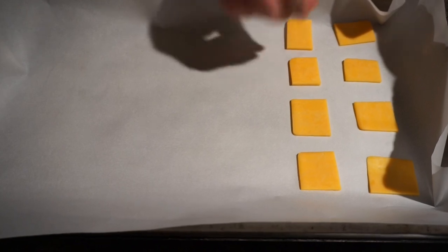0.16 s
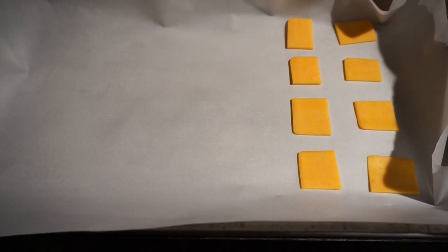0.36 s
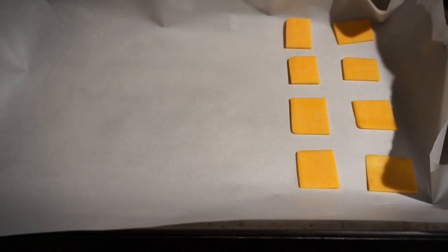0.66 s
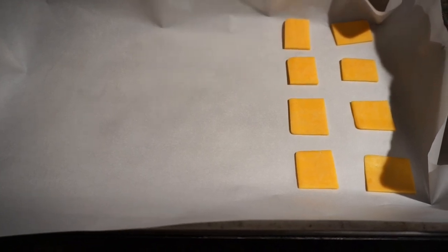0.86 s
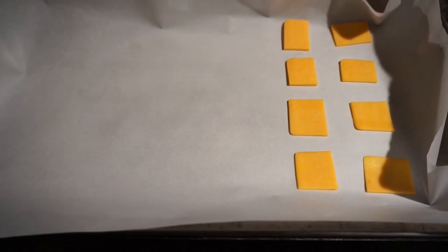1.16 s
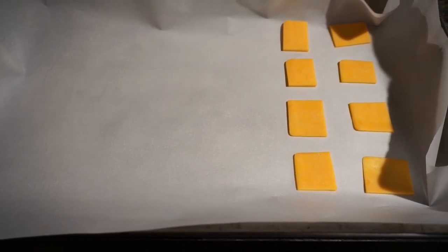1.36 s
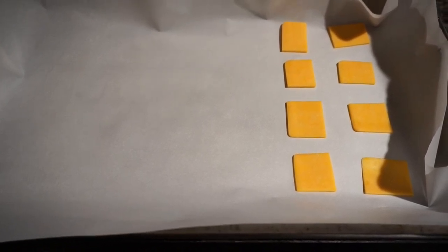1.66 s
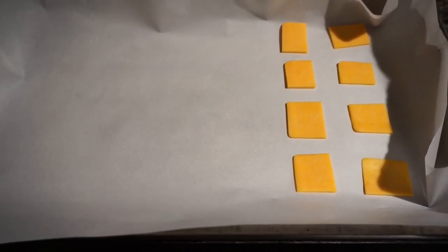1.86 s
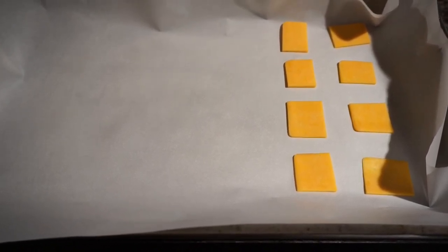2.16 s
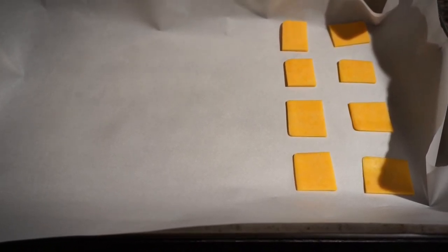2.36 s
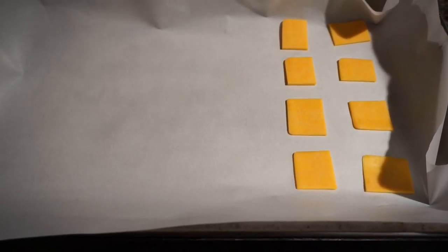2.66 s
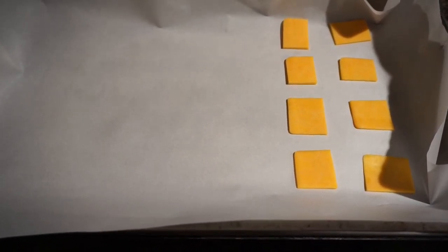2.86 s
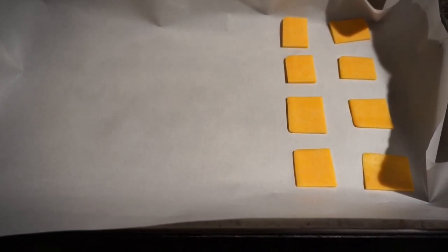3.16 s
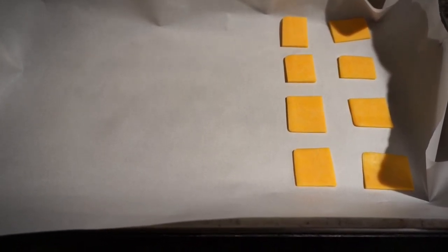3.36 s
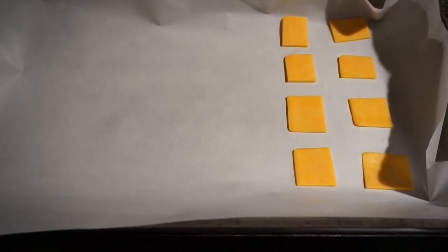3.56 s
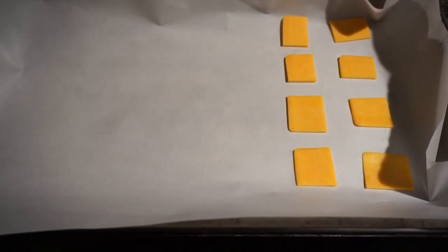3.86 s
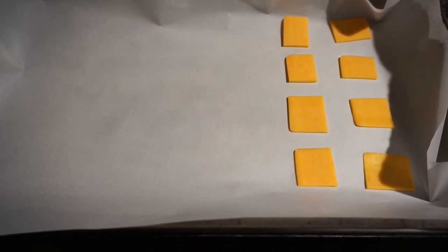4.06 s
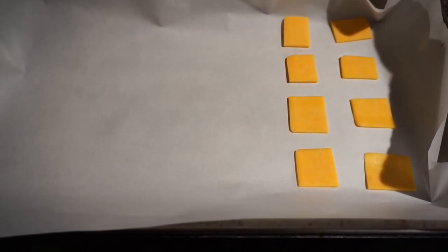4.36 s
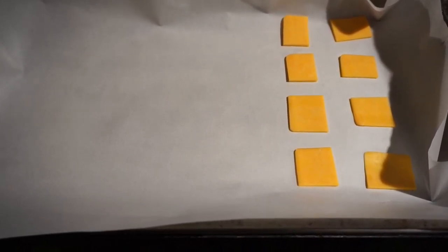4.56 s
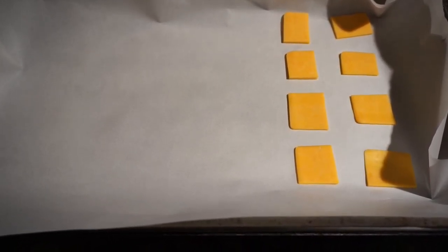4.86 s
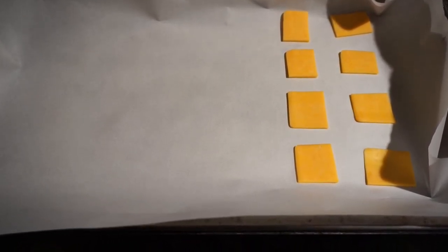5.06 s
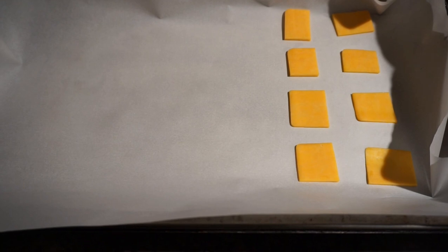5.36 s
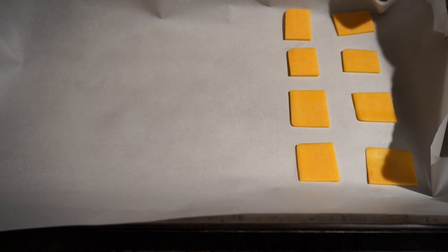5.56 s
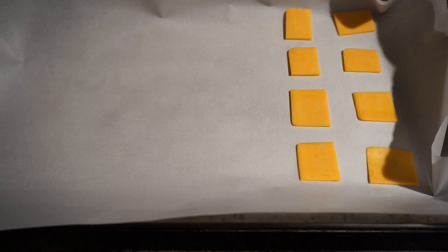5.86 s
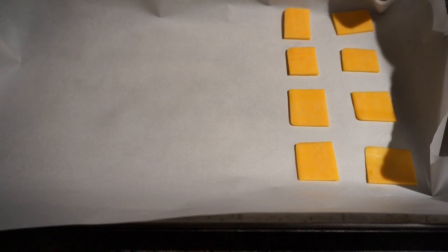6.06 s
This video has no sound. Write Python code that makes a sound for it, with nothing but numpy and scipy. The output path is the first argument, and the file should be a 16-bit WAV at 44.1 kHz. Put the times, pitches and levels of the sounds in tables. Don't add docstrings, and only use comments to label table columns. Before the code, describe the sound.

Faint fridge hum and microphone hiss lie under close, bright parchment noise, heard toward the right. Quick rustles and brief metal pan scrapes open, followed by sparse snaps, a sharp crack and soft paper rubbing. Then the sheet crumples hard, popping and buckling in several clusters. Finally something solid thumps and clatters onto the worktop, with short kitchen echoes, and the activity dies away.

```python
import sys
import numpy as np
from scipy import signal
from scipy.fft import rfft, irfft
from scipy.io import wavfile
from scipy.ndimage import uniform_filter1d

SR = 44100
rng = np.random.default_rng(int(sys.argv[2]) if len(sys.argv) > 2 else 0)


def wrap_up_sound(samples):
    columns = np.atleast_2d(samples).T
    tamed = np.clip(columns, -1, 1)
    steps = np.round(tamed * 32767).astype(np.int16)
    wavfile.write(sys.argv[1], SR, steps)


def invert_db(x):
    u = np.asarray(x, float) / 20
    return 10 ** u


N = 273861
STROKE_DB = 20


def unit(x):
    return x / np.sqrt(np.mean(x ** 2))


def peak(x, db):
    return x * invert_db(db) / np.max(np.abs(x))


def shape(x, points):
    hz, db = np.transpose(points)
    f = np.fft.rfftfreq(x.shape[-1], 1 / SR)
    gain = invert_db(np.interp(np.log(f + 1), np.log(hz), db))
    return irfft(rfft(x) * gain, x.shape[-1])


def band(x, hz, width_hz):
    edges = np.clip([hz - width_hz / 2, hz + width_hz / 2], 20, SR / 2 - 1000)
    return signal.sosfilt(signal.butter(2, edges, "bandpass", fs=SR, output="sos"), x)


def fade(t60, count):
    return np.exp(-np.log(1000) * np.arange(count) / SR / max(t60, 1e-3))


def ring(hz, t60, count):
    return np.sin(2 * np.pi * hz * np.arange(count) / SR) * fade(t60, count)


def struck(modes, push):
    response = sum(invert_db(db) * ring(hz, t60, count=16384) for hz, db, t60 in modes)
    return signal.fftconvolve(push, response)


def add(out, s, x):
    i = int((s + .0006) * SR)
    out[i:i + len(x)] += x[:len(out) - i]


def fridge():
    # multiple, level in dB.
    harmonics = [(3, -25), (4, -29.5), (5, -9.5), (6, -18.5), (7, -13.5), (8, -7)]
    # time in seconds, level in dB.
    load = [(0.0, -58), (0.31, -50.5), (0.53, -59.5), (4.13, -58), (4.67, -56), (5.1, -65.5), (5.33, -61.5),
            (5.569, -53), (5.86, -61), (6.21, -62)]
    motor_hz, waver_db = 59.2, 1.2
    waver = uniform_filter1d(rng.standard_normal((2, N)), size=12000)
    waver = waver / waver.std()
    phase = 2 * np.pi * np.cumsum(motor_hz * (1 + 0.00089 * waver[0])) / SR
    hum = np.zeros(N)
    for k, db in harmonics:
        level_db = db + 1.0 + waver_db * np.roll(waver[1], 9000 * k)
        hum += invert_db(level_db) * np.sin(k * phase + k * k)
    fan = invert_db(-22.5) * unit(band(rng.standard_normal(N), 519, 25))
    return (hum + fan) * invert_db(np.interp(np.arange(N) / SR, *np.transpose(load)))


def floor():
    # frequency in Hz, density in dB per Hz.
    noise_colour = [(12, -82), (20, -38), (140, -27.5), (175, -19), (300, -10.5), (500, -8.5), (630, -15.5),
                    (1040, -17.5), (2000, -19), (8000, -26), (12500, -25.5), (16000, -25)]
    mid, side = shape(rng.standard_normal((2, N)), noise_colour)
    side = shape(side, [(40, 8), (125, -16), (300, -10.5), (700, -2.5), (1500, -0.5)])
    scale = invert_db(-63) / np.std(band(mid, 8400, 15200))
    return scale * invert_db([[-1.1], [1.1]]) * np.array([mid + side, mid - side])


def rustle():
    # centre in Hz, width in Hz, pops per second.
    creases = [(2800, 2070, 2100), (1330, 1020, 700), (6240, 4940, 2200), (11400, 10200, 3000)]
    crease_db = [1, -1.5, 2.5, 0]
    # peak time, swell and fade in seconds, peak level in
    # dB, # fineness in dB per octave.
    strokes = [(0.0, .05, 0.11, -52.5, -0.5), (0.103, 0.0093, 0.058, -42, 1.5),
               (.24, 0.01, 0.14, -64.5, -15.5), (0.26, 0.0086, 0.06, -44.5, 3),
               (.78, 0.12, 0.14, -61.5, 4.5), (.835, 0.074, 0.21, -59.5, -0.5),
               (1.11, 0.5, 0.42, -62, 6), (1.23, 0.021, 0.051, -48, 0),
               (1.33, 0.052, 0.27, -65.5, 7.5), (1.45, 0.16, 0.023, -59.5, 0.5),
               (1.6, 0.6, 1, -64.5, 2.3), (1.743, 0.017, 0.017, -47.5, 6),
               (1.8, 0.037, 0.17, -59, 3.5), (2.108, 0.13, 0.15, -54, 3.5), (2.17, .04, .1, -55, 3.5),
               (2.235, 0.12, 0.033, -54.5, 2), (2.452, 0.61, 0.42, -73, 4),
               (2.8, 0.11, 0.18, -66, 2.5), (2.932, 0.052, 0.44, -53.5, 1.5),
               (3.291, 0.032, 0.09, -51.5, 1), (5.463, 0.022, 0.067, -55, 0.9),
               (6.21, 0.041, .1, -76, -12)]
    # peak time, swell and fade in seconds, peak level
    # in dB, # fineness in dB per octave.
    more_strokes = [(3.353, 0.018, 0.084, -40, 0), (3.38, 0.048, 0.11, -48, 1),
                    (3.434, 0.0071, 0.077, -43, -4.5), (3.486, 0.01, 0.13, -43, -2.5),
                    (3.525, 0.015, 0.086, -55, -14), (3.576, 0.033, 0.075, -47, -5),
                    (3.608, 0.027, 0.16, -45, 2), (3.7, 0.054, 0.39, -55, -1), (3.86, 0.045, 0.18, -61, 3),
                    (3.955, 0.011, 0.13, -59, 4), (4.06, 0.16, 0.063, -57.5, 0.8),
                    (4.13, 0.079, 0.093, -61, 1.5), (4.26, 0.064, .1, -66.5, -12),
                    (4.29, 0.032, 0.033, -44, -1.5), (4.37, 0.064, .08, -63.5, 1.5),
                    (4.5, 0.023, 0.13, -53.5, -9), (4.648, 0.14, 0.22, -45, 0),
                    (4.79, 0.32, 0.07, -50.5, 3.5), (4.823, 0.035, 0.037, -46, -1),
                    (4.915, 0.016, 0.42, -62, 4), (5.048, 0.21, 0.19, -55.5, 1),
                    (5.12, 0.25, 0.062, -71.5, 12), (5.52, 0.019, 0.16, -42.5, -6),
                    (5.6, 0.26, 0.27, -60, 1.5)]
    s, swell, fall, top_db, fine_db = np.transpose(strokes + more_strokes)[:, :, None]
    t = np.arange(0, N + 64, 64) / SR
    rise_part = (s - t) / np.maximum(swell, .005)
    fall_part = (t - s) / np.maximum(fall, .005)
    stroke_db = top_db - STROKE_DB * np.maximum(rise_part, fall_part)
    stress = uniform_filter1d(np.repeat(rng.standard_normal(N // 256 + 1), 256), size=256)[:N]
    out = np.zeros(N)
    for (hz, width_hz, rate), db in zip(creases, crease_db):
        when, sign, size = rng.random(N), rng.standard_normal(N), rng.exponential(size=N)
        pop_size = invert_db(1.8 * np.minimum(size, 2) + 2.7 * np.minimum(stress, 1))
        pops = (when < rate / SR) * np.clip(sign, -2, 2) * pop_size
        octaves = np.log2(hz / creases[0][0])
        gain = np.sqrt(np.sum(invert_db(stroke_db + db + fine_db * octaves) ** 2, axis=0))
        swarm = unit(band(band(pops, hz, width_hz), hz, 1.46 * width_hz))
        out += swarm * np.interp(np.arange(N) / SR, t, gain) * invert_db(-3.0)
    return out


def snaps():
    # start in seconds, peak in dB, panel ring in Hz,
    # ring length in cycles.
    pops = [(0.024, -29.5, 3870, 27), (0.495, -27.5, 9520, 7), (0.706, -33, 1860, 2.5),
            (0.818, -49, 1740, 29), (1.2239, -19, 3200, 4.7), (1.2866, -28, 3050, 10),
            (1.4465, -21.5, 5740, 7.8), (1.462, -18.5, 8650, 13), (2.206, -23, 3330, 9.6),
            (2.426, -25, 6500, 24), (2.5913, -37, 2050, 24), (2.9178, -46, 1850, 20),
            (3.233, -31.5, 1340, 9.1), (3.34, -29, 1700, 11), (3.365, -24, 4800, 8), (3.388, -22, 3640, 14),
            (3.43, -23, 1340, 29), (3.437, -19, 3280, 26), (3.451, -24, 3200, 8), (3.485, -34, 4100, 10),
            (3.515, -19, 1930, 17), (3.601, -42, 3800, 12), (3.626, -23, 5530, 8), (3.5685, -28, 1900, 23),
            (3.644, -10.5, 5040, 6.8), (3.9509, -42, 820, 13), (4.0535, -17, 4230, 7.3),
            (4.2343, -29.5, 2350, 13), (4.2692, -17, 2430, 46), (4.325, -21.5, 2690, 2.6),
            (4.468, -35, 2340, 25), (4.481, -28, 2220, 21), (4.493, -21, 2230, 27), (4.549, -25, 2270, 9.2),
            (4.5565, -23.5, 2160, 22), (4.608, -14, 8200, 13), (4.608, -20, 2650, 25),
            (4.633, -16.5, 2730, 18), (4.641, -27, 4500, 7.3), (4.656, -14, 3900, 15),
            (4.673, -19, 2680, 16), (4.681, -39, 2500, 16), (4.693, -25, 2440, 16), (4.814, -23, 3320, 10),
            (4.6551, -16.5, 2610, 26), (5.046, -12, 7000, 8.8), (5.278, -39, 2530, 6.4),
            (5.4325, -46, 910, 18), (5.5012, -36, 3000, 6), (5.5037, -5, 2050, 8.4)]
    # start in seconds, peak in dB, panel ring in Hz,
    # crack level above the ring in dB.
    cracks = [(0.2547, -28, 1350, 11.5), (0.2851, -24, 1045, 3), (1.052, -19, 7300, -8),
              (1.198, -31, 2740, -9), (1.7325, -9.5, 7500, -3.5), (2.058, -39, 4120, -7),
              (2.0797, -31, 4040, -4), (2.1133, -16, 3640, -13), (2.155, -18, 2690, 2.5),
              (2.4053, -36, 2710, 0.5), (2.933, -40.5, 3380, 14), (3.1412, -37, 1360, 2),
              (3.283, -29.5, 1650, 2), (3.3495, -28.5, 3170, 11), (3.3716, -15.5, 3760, 0),
              (3.484, -21.5, 1220, 9), (3.5988, -20, 1820, 8), (3.853, -26, 5200, 1),
              (4.115, -29, 4240, -18), (4.2857, -28, 2560, 3), (4.5185, -18.5, 2390, 5.5),
              (4.556, -12.5, 6300, -3.5), (4.595, -23, 2160, 5), (4.6394, -18, 2450, 11),
              (4.76, -22, 2550, -1), (4.801, -15, 3560, -6.5), (5.094, -19, 7600, -4),
              (5.462, -31.5, 4100, -18), (5.9886, -44, 2800, -1)]
    pop_crack_db, crack_cycles, body_db = -48, 39, -70
    rows = [(s, db, hz, pop_crack_db, cycles) for s, db, hz, cycles in pops]
    rows += [(*row, crack_cycles) for row in cracks]
    out = np.zeros(N)
    for (s, db, hz, crack_db, cycles), chance in zip(rows, rng.standard_normal((len(rows), 2048))):
        chance[0] = 5
        crack = band(chance * fade(.005, count=2048), 10000, 14500)
        body = band(chance[::-1] * fade(0.0014, count=2048), 1950, 3000)
        panel = ring(hz, np.clip(cycles, 3, 24) / hz, count=2048)
        add(out, s, peak(panel, db - 10.0) + peak(crack, db + crack_db) + peak(body, db + body_db))
    return out


def pan_knocks():
    # start in seconds, peak in dB, brightness in
    # dB, # contact in seconds.
    blows = [
        (0.1012, -23, 5.5, 0.011),
        (0.1135, -25.5, -12, 0.0036),
        (0.253, -38.5, 13, 0.007),
        (0.2837, -24, 2, 0.011),
        (0.2966, -40, -10, 0.0018),
    ]
    # frequency in Hz, level in dB, t60 in seconds.
    pan = [(1021, 4, 0.045), (1333, 4, 0.077), (1707, -12, .05), (2370, -3, 0.068), (2850, -3, 0.12),
           (3226, -7, .04), (3600, -2, .035), (3990, 0, .06), (4640, -18, .04)]
    slip_t60_s = .006
    out = np.zeros(N)
    for (s, db, bright_db, contact), chance in zip(blows, rng.standard_normal((len(blows), 4096))):
        chance[0] = 5
        held = np.minimum(fade(slip_t60_s, count=4096) * 1000 ** (contact / slip_t60_s), 1)
        push = chance * held
        add(out, s, peak(struck(pan, push), db - 8.0))
        add(out, s, peak(band(push, 2700, 3520), db - 4.0))
        add(out, s, peak(band(push, 9140, 13650), db + bright_db - 2.0))
    return out


def bumps():
    # start in seconds, peak in dB, ring in Hz, ring t60 in seconds,
    # slap level in dB.
    blows = [
        (0.2318, -30, 345, 0.069, 9),
        (0.233, -44, 580, 0.08, -10),
        (0.386, -37.5, 353, 0.016, -10),
        (3.598, -48.5, 480, 0.16, 8),
        (4.63, -45, 403, 0.061, 26),
        (5.319, -49.5, 350, 0.057, -23),
        (5.414, -46.5, 550, 0.018, 13.5),
        (5.5062, -17.5, 413, 0.014, 3),
        (5.62, -36, 375, 0.054, 16.5),
    ]
    out = np.zeros(N)
    for (s, db, hz, t60, slap_db), chance in zip(blows, rng.standard_normal((len(blows), 8192))):
        slap = band(chance * fade(0.1, count=8192), 780, 1200)
        add(out, s, invert_db(db + 0.5) * ring(hz, t60, count=8192) + peak(slap, db + slap_db - 15.5))
    return out


def folds():
    # start in seconds, peak in dB, ring in Hz, ring t60 in seconds.
    buckles = [(0.2324, -36, 1050, .03), (1.407, -28, 2820, 0.0069), (1.733, -30, 2390, 0.028),
               (2.999, -37.5, 2090, 0.026), (3.042, -30, 1450, 0.0092), (3.4305, -30, 1090, 0.014),
               (3.4489, -31, 1160, 0.012), (3.459, -33, 1300, .015), (3.48, -38, 1310, 0.024),
               (3.514, -24.5, 954, 0.061), (3.531, -34, 1150, 0.015), (3.554, -42, 1570, 0.034),
               (3.608, -23.5, 1720, 0.016), (4.271, -27.5, 1290, 0.016), (4.621, -29, 2670, 0.037),
               (4.8215, -22.5, 924, 0.025)]
    out = np.zeros(N)
    for (s, db, hz, t60), chance in zip(buckles, rng.standard_normal((len(buckles), 1024))):
        chance[0] = 14
        tones = [(hz, 0, t60), (1.228 * hz, -3, t60)]
        add(out, s, peak(struck(tones, chance * fade(0.0069, count=1024)), db - 7.5))
    return out


def slides():
    # peak time, swell and fade in seconds, peak level in dB, centre in Hz.
    rubs = [(.79, 0.069, .08, -62, 5100), (.79, .05, .05, -68.5, 8000), (.83, 0.034, 0.055, -60.5, 1880),
            (1.03, .06, 0.046, -65, 4350), (1.12, 0.06, .15, -58, 10500), (1.24, .03, .04, -56, 3020),
            (1.3, .04, 0.079, -66, 3050), (1.38, .08, .1, -57, 9300), (1.42, .03, 0.066, -55, 3020),
            (1.82, 0.069, 0.11, -59.5, 2600), (2.08, .03, 0.036, -59, 4100), (2.08, .03, .04, -55, 2600),
            (2.169, 0.071, 0.049, -48, 2800), (2.44, .02, .06, -71, 6500), (3.45, .02, 0.025, -44, 1195),
            (3.53, 0.025, .05, -47, 1080), (3.6, .04, 0.088, -47, 1680), (4.079, .03, 0.18, -59, 4130),
            (4.28, .03, 0.04, -58, 2400), (4.5, .05, .08, -51, 2250), (4.66, 0.092, 0.068, -44, 2520),
            (4.81, .012, 0.041, -55, 3360), (5.09, 0.027, 0.085, -52, 4040), (5.09, .03, 0.044, -62, 1400)]
    width = .3
    out, t = np.zeros(N), np.arange(-8192, 16384) / SR
    for (s, swell, fall, db, hz), chance in zip(rubs, rng.standard_normal((len(rubs), len(t)))):
        rub = unit(band(band(chance, hz, width * hz), hz, 1.8 * width * hz))
        drop_db = STROKE_DB * np.maximum(-t / max(swell, .005), t / max(fall, .005))
        add(out, s + t[0], rub * signal.windows.tukey(len(t), .5) * invert_db(db - drop_db))
    return out


def close_snaps():
    # start in seconds, peak in dB, centre in Hz, width in Hz.
    near_pops = [(1.09, -21.5, 14300, 3704), (1.7375, -25, 4000, 4320), (2.113, -26, 7900, 4320),
                 (2.205, -26, 12000, 6000), (2.4053, -30, 10900, 9600), (2.41, -35, 11000, 8640),
                 (3.283, -30, 5070, 5556), (3.3486, -13.5, 4200, 5500), (3.3538, -17, 4500, 5450),
                 (3.3617, -23, 5000, 5000), (3.377, -20, 4000, 4000), (3.387, -24, 4000, 4000),
                 (3.95, -36, 12000, 8000), (4.117, -33, 14600, 3704), (4.477, -40, 8000, 8000),
                 (4.549, -34, 7000, 5000), (4.608, -8.5, 9900, 8000), (4.62, -21, 8000, 6000),
                 (4.6387, -16.5, 5940, 8060), (4.746, -28, 6000, 6000), (4.794, -22, 7300, 3970),
                 (4.801, -15.5, 5850, 8100), (5.3, -38, 10040, 6040), (5.0374, -18, 8889, 7600),
                 (5.0444, -5.5, 9860, 6200), (5.073, -25, 7500, 6444), (5.0965, -37, 9300, 6440)]
    out = np.zeros(N)
    for (s, db, hz, width_hz), chance in zip(near_pops, rng.standard_normal((len(near_pops), 512))):
        chance[0] = 6
        add(out, s, peak(band(chance * fade(0.0048, count=512), hz, width_hz), db))
    return out


def ticks():
    # start in seconds, peak in dB.
    taps = [
        (2.523, -36),
        (2.591, -48),
    ]
    # frequency in Hz, level in dB, t60 in seconds.
    part = [(1930, -1.5, 0.037), (3250, -4, 0.02), (3900, -5.5, 0.027)]
    out = np.zeros(N)
    for s, db in taps:
        add(out, s, peak(struck(part, [1]), db - 3.5))
    return out


def heavy_drop():
    # start in seconds, peak in dB.
    landings = [
        (5.5015, -30),
        (5.504, -14.5),
    ]
    # frequency in Hz, level in dB, t60 in seconds.
    item = [(340, -16, 0.12), (500, -17, 0.05), (683, -4, 0.13), (912, -4.5, 0.15), (1092, 4.5, 0.092),
            (1350, -19, .12), (1587, -15, 0.22), (1940, 6, 0.06), (2070, -19, 0.43), (2610, -12, 0.092),
            (2810, -7, 0.13), (3350, -6, 0.11), (3800, -28, 0.051), (4490, -2, 0.05)]
    # frequency in Hz, density in dB per Hz.
    clatter = [(59, -54), (120, -3), (364, -4), (1090, 6.5), (1250, -26), (1950, 2), (3740, -5.5),
               (15000, -31)]
    out = np.zeros(N)
    for s, db in landings:
        push = rng.standard_normal(4096) * fade(0.012, count=4096)
        two_contacts = np.r_[.5, np.zeros(150), 1]
        add(out, s, peak(struck(item, two_contacts), db - 7))
        add(out, s, peak(shape(np.roll(push, 64), clatter), db + 1.5))
    return out


def echoes(x, db):
    # delay in seconds, level in dB.
    worktop = (.0056, -3)
    # delay in seconds, level in dB.
    cupboards = [(0.0134, -13), (0.031, -17)]
    echo = np.zeros(4096)
    for s, echo_db in [worktop] + cupboards:
        echo[int(s * SR)] = invert_db(echo_db + db)
    dull = signal.butter(1, 7500, fs=SR, output="sos")
    return x + signal.sosfilt(dull, signal.fftconvolve(x, echo)[:N])


def kitchen(x):
    # centre in Hz, t60 in seconds, level in dB.
    decays = [(250, 0.75, -29), (477, 0.3, 5), (1040, 0.69, 1), (2080, 0.39, 4.5), (4690, 0.37, 2),
              (8200, 0.24, 0), (14000, 0.29, 0.5)]
    places = 3
    out = np.zeros((2, N))
    for place in range(places):
        tail = np.zeros((2, 32768))
        for hz, t60, db in decays:
            mid, side = band(rng.standard_normal((2, 32768)), hz, 0.91 * hz) * fade(t60, count=32768)
            both = mid + np.clip((hz / 900) ** 2, 0, 1) * side * np.array([[1], [-1]])
            tail += invert_db(db) * both / np.sqrt(np.sum(mid ** 2) * SR / 0.4 / hz)
        onset = np.minimum(np.arange(32768) / SR / 0.00014, 1)
        tail = np.pad(tail * onset, ((0, 0), (300, 0)))
        turn = np.pi * (17 * np.arange(N) / SR + place / places)
        share = np.sqrt(2 / places) * np.cos(turn)
        out += signal.fftconvolve((share * x)[None], tail, axes=1)[:, :N]
    return invert_db([[-1.2], [1.2]]) * out


def ports(x):
    # frequency in Hz, difference in dB.
    shading = [(60, 36), (110, 23), (200, -3), (380, -0.5), (700, -5), (1290, -13), (2380, -12.5),
               (4400, -16), (8120, -4), (15000, -8.5)]
    left_lag_s = 4.2 / 44100
    hz, db = np.transpose(shading)
    f = np.fft.rfftfreq(N, 1 / SR)
    left = irfft(rfft(x) * np.exp(-2j * np.pi * f * left_lag_s), N)
    return np.array([shape(left, np.c_[hz, db / 2]), shape(x, np.c_[hz, -db / 2])])


def scene():
    small = signal.butter(4, 260, "highpass", fs=SR, output="sos")
    hits = snaps() + folds()
    solid = pan_knocks() + bumps() + ticks() + heavy_drop()
    hits, knock, swarm, close = signal.sosfilt(small, [hits, solid, rustle(), close_snaps()])
    swarm = swarm + slides()
    room = kitchen(hits + invert_db(-1.5) * knock + swarm + invert_db(-2.0) * close)
    duck_s, duck_db = 5.14, -3.5
    duck = invert_db(duck_db * np.clip((np.arange(N) / SR - duck_s) / 0.025, 0, 1))
    thud = invert_db(-25) * band(solid, 90, 130)
    direct = echoes(hits, db=0.0) + echoes(knock, db=-6.5) + swarm + close
    return ports(direct) + thud + room + fridge() + duck * floor()


def roll_off(x):
    return signal.sosfilt(signal.butter(12, 16810, fs=SR, output="sos"), x)


def record(dry):
    # frequency in Hz, level in dB.
    microphone = [(9000, 0.5), (13000, -1.5), (15500, -3.5), (16500, -25)]
    top = signal.ellip(8, .2, 70, 16400, fs=SR, output="sos")
    return roll_off(signal.sosfilt(top, shape(dry, microphone)))


dry = scene()
out = record(dry)
wrap_up_sound(out)
```